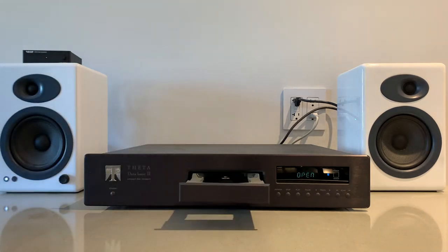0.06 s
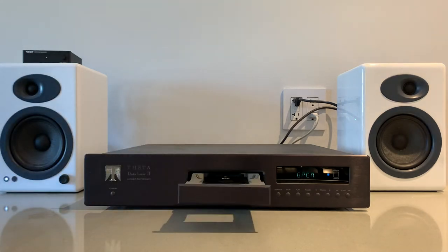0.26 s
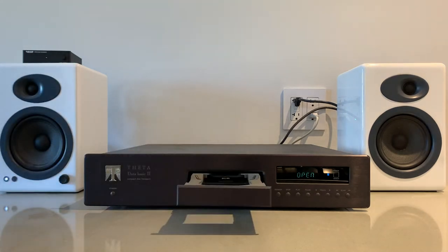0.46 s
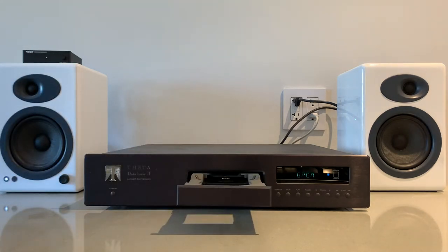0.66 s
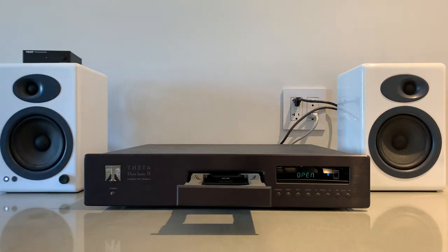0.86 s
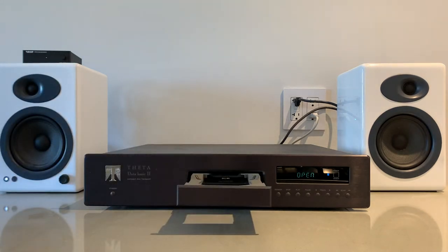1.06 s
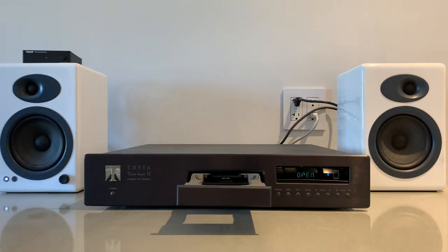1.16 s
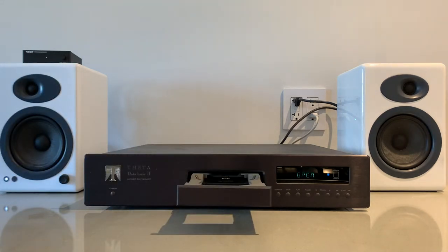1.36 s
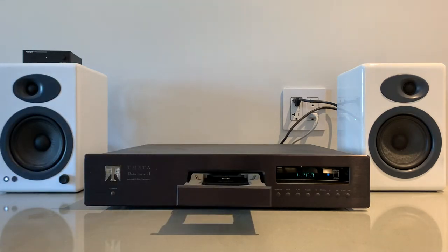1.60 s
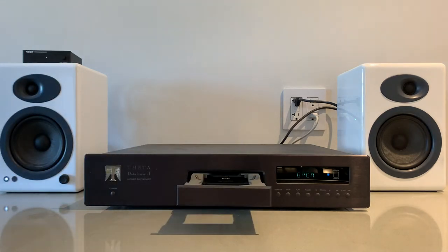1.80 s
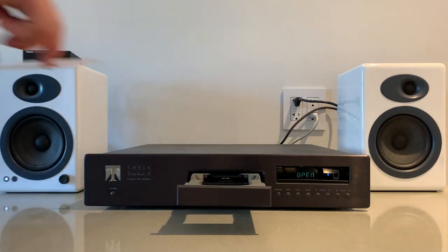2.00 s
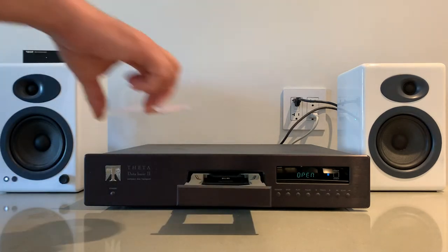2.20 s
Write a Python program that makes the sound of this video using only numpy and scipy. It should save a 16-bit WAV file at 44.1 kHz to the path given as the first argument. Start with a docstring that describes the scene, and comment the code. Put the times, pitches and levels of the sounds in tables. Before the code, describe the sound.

A disc player's tray clicks sharply with a soft thud, then ticks faintly over room hum.

```python
"""A quiet room, where a disc player's tray mechanism trips. A plastic latch snaps with a sharp click,
the tray bumps the case with a soft thud and the lid flexes. Faint ticks follow as the tray slides.
Under it all lie room rumble, microphone hiss, the tray motor's faint whirr and the low hum
of what may be a distant engine slowly gathering speed. Heard through two microphone ports."""
import sys
import numpy as np
from scipy import signal
from scipy.fft import rfft, irfft, next_fast_len
from scipy.io import wavfile

SR = 44100
rng = np.random.default_rng(int(sys.argv[2]) if len(sys.argv) > 2 else 0)


def master(y):
    """Save y as 16-bit WAV."""
    cut = np.clip(np.atleast_2d(y).T, -1, 1)
    pcm = np.round(cut * 32767)  # scale
    wavfile.write(sys.argv[1], SR, pcm.astype(np.int16))


N = 99225

# likeness of the two ports: freq_hz, coherence
PORT_COHERENCE = [(30, .93), (70, .97), (160, .95), (260, .65), (430, .3), (1000, .25), (3000, .25),
                  (4500, .5), (6500, .85), (8400, .99), (10500, .9), (13300, .98), (16000, .85)]
# flat spectrum: freq_hz, density_db
WHITE = [(20, 0), (20000, 0)]


def amp(db):
    """Decibels to gain."""
    return 10 ** (np.asarray(db) / 20)


def unit(x):
    """Scale to rms 1."""
    return x / np.sqrt(np.mean(x ** 2) + 1e-20)


def read(points, hz):
    """Interpolate a table over log frequency."""
    freq_hz, value = np.transpose(points)
    return np.interp(np.log(hz + 1), np.log(freq_hz + 1), value)


def add(mix, start_s, sound):
    """Mix a sound in at start_s."""
    part = mix[:, round(start_s * SR):][:, :sound.shape[-1]]
    part += sound[..., :part.shape[1]]


def course(levels_db):
    """Ramp through start, mid and end levels."""
    return np.interp(np.arange(N), [0, N / 2, N], levels_db)


def drift(top_hz):
    """Slow random wander, rms 1."""
    t = np.arange(N) / SR
    rates_hz = top_hz * np.geomspace(0.1, 1, 12)
    return unit(sum(np.sin(2 * np.pi * (hz * t + rng.random())) for hz in rates_hz))


def port_noise(colour, samples, spacing=1):
    """Coloured noise, rms 1, with the coherence and phase lag of the two ports."""
    # lead of the right port: freq_hz, phase_rad
    right_lead = [(0, 0), (200, 0), (450, -.6), (1300, .8), (2200, 1.7), (3050, 3.14), (5700, 6.0),
                  (8400, 9.42), (13300, 15.7), (16000, 19.1)]
    hz = np.fft.rfftfreq(samples, 1 / SR)
    common, separate = rfft(rng.standard_normal((2, samples)))
    coherence = np.clip(read(PORT_COHERENCE, hz), 0, 1)
    half_lag = np.exp(-0.5j * spacing * np.interp(hz, *np.transpose(right_lead)))
    left = common * half_lag
    right = (coherence * common + np.sqrt(1 - coherence ** 2) * separate) / half_lag
    return unit(irfft(np.array([left, right]) * amp(read(colour, hz)), samples))


def port_phases(hz, spread):
    """A tone's phase at each port: in step in the bass, apart in the midrange, more so from afar."""
    gap_rad = spread * np.arccos(np.clip(read(PORT_COHERENCE, hz), 0, 1))
    return np.array([[0.5], [-0.5]]) * gap_rad * rng.choice([-1, 1])


def burst(colour, rise_s, t60_s):
    """Dense short resonances, as decaying noise."""
    t = np.arange(SR // 2) / SR
    return port_noise(colour, len(t)) * (1 - np.exp(-t / rise_s)) * amp(-60 * t / t60_s)


def ring(modes, rise_s):
    """Decaying modes that swell over rise_s."""
    t = np.arange(SR // 2) / SR
    tones = sum(amp(db - 60 * t / t60_s) * np.sin(2 * np.pi * hz * t + port_phases(hz, spread=0.53))
                for hz, db, t60_s in modes)
    return (1 - np.exp(-(t / rise_s) ** 2)) * tones


def room(x, wet_db, onset_s):
    """Add a diffuse tail; each band dies at its own rate."""
    # room decay: freq_hz, t60_s
    decay = [(130, 0.81), (400, 0.12), (1200, 0.31), (3000, 0.3), (7000, 0.28), (14000, 0.14)]
    hz, frame_s, bands = signal.stft(port_noise(WHITE, SR, spacing=0), SR, nperseg=256)
    tail = signal.istft(bands * amp(-60 * frame_s / read(decay, hz)[:, None]), SR, nperseg=256)[1]
    t = np.arange(tail.shape[1]) / SR
    tail *= 1 - np.exp(-(t / onset_s) ** 4)
    tail /= np.linalg.norm(tail[0])
    return x + amp(wet_db) * signal.fftconvolve(x, tail, axes=1)[:, :N]


def rumble_and_hiss(level_db=-52.5, split_hz=4000):
    """Steady room rumble; the microphone hiss above it sinks a little and returns."""
    # background spectrum: freq_hz, density_db
    colour = [(20, -26), (30, -2.5), (39, 2), (50, 3.5), (70, 3.5), (95, 1.5), (140, 2), (200, -6.5),
              (320, 0), (410, -7), (520, -4.5), (800, -12), (1100, -15.5), (1600, -20), (2500, -28.5),
              (3500, -40), (6300, -51.5), (9500, -45.5), (12000, -42), (13500, -46.5), (15600, -45)]
    # lift above split_hz: time_s, gain_db
    hiss_lift = [(0, 7.5), (0.35, 7.5), (0.6, 2.5), (1.0, 2.5), (1.501, 3.5), (1.9, 6.5), (2.25, 4.5)]
    noise = amp(level_db) * port_noise(colour, N)
    treble = signal.sosfiltfilt(signal.butter(2, split_hz, "high", fs=SR, output="sos"), noise)
    lift_db = np.interp(np.arange(N) / SR, *np.transpose(hiss_lift))
    return noise + treble * (amp(lift_db) - 1)


def engine(main_order=8, flutter_depth=0.4, main_waver_db=1.82, waver_db=3.0, jitter_rad=0.62):
    """Wavering multiples of one rising shaft speed; the main line flutters once a turn."""
    # run-up: time_s, speed_hz, main_db
    run_up = [(0, 19.4, -60.5), (0.099, 20.65, -51), (0.4, 22.1, -45.5), (0.618, 22.2, -47.5),
              (0.86, 22.7, -60), (1.1, 23.5, -57.5), (1.292, 23.7, -64), (1.5, 24.3, -52.5),
              (1.9, 24.8, -58), (2.25, 25, -66)]
    # other lines: order, start_db, mid_db, end_db
    orders = [(3, -61, -51.5, -55.5), (5, -62, -56, -63), (9, -60, -66, -63), (10, -64, -62, -68),
              (11, -66, -70, -76), (12, -71, -73, -64), (13, -66, -64.5, -64.5), (15, -65, -67, -74),
              (16, -71, -72, -74), (19, -79, -68.5, -70), (22, -79, -65, -77)]
    t = np.arange(N) / SR
    time_s, speed_hz, main_db = np.transpose(run_up)
    shaft_rad = 2 * np.pi * np.cumsum(np.interp(t, time_s, speed_hz)) / SR
    hum = amp(np.interp(t, time_s, main_db) + main_waver_db * drift(12)) * np.sin(main_order * shaft_rad)
    hum *= 1 + flutter_depth * np.sin(shaft_rad + drift(3.6))
    for order, *levels_db in orders:
        level_db = course(levels_db) + waver_db * drift(4.067)
        phase_rad = 2 * np.pi * rng.random() + port_phases(order * speed_hz.mean(), spread=1.36)
        hum = hum + amp(level_db) * np.sin(order * shaft_rad + phase_rad + jitter_rad * drift(4.413))
    return np.sqrt(2) * hum


def motor_whirr():
    """The tray motor's gears sing faintly in narrow noise bands."""
    # gear bands: centre_hz, width_hz, start_db, mid_db, end_db
    bands = [(702.5, 17, -72, -79, -67.5), (781.3, 8.3, -71, -72, -71.5), (844.5, 34, -73.5, -70.5, -69),
             (1560, 52, -69.5, -81, -95)]
    hz = np.fft.rfftfreq(N, 1 / SR)
    spectrum = rfft(port_noise(WHITE, N))
    out = np.zeros((2, N))
    for centre_hz, width_hz, *levels_db in bands:
        peak = 1 / (1 + (2 * (hz - centre_hz) / width_hz) ** 2)
        out += amp(course(levels_db)) * unit(irfft(spectrum * peak, N))
    return out


def lid_booms(start_hz=186.4, end_hz=142.1, settle_s=0.012, rise_s=0.025, t60_s=0.12):
    """The lid flexes; its pitch settles as each swing dies."""
    # faint nudge, main boom, rebound: start_s, gain_db
    flexes = [(0.008, -27.5), (0.443, -9), (0.524, -25)]
    t = np.arange(SR // 2) / SR
    pitch_hz = end_hz + (start_hz - end_hz) * np.exp(-t / settle_s)
    envelope = (1 - np.exp(-(t / rise_s) ** 2)) * amp(-60 * t / t60_s)
    boom = envelope * np.sin(2 * np.pi * np.cumsum(pitch_hz) / SR)
    out = np.zeros((2, N))
    for start_s, gain_db in flexes:
        add(out, start_s, amp(gain_db) * boom)
    return out


def latch_click(ring_db=-7, clack_db=-50):
    """The plastic latch snaps over and chatters; the first contact rings it and the tray."""
    # latch contacts: start_s, gain_db
    contacts = [(0.4110, -40), (0.4123, -37.5), (0.4150, -54), (0.4213, -50), (0.4285, -57), (0.4345, -62)]
    # snap spectrum: freq_hz, density_db
    snap = [(300, -26), (800, 6), (1300, 13), (2000, 5.5), (2600, -12), (3200, -4), (4300, 4), (5500, 0),
            (7000, 6.5), (9000, 7), (10800, 5), (12000, 9), (13500, 0), (15600, 4.5)]
    # latch resonances: pitch_hz, gain_db, t60_s
    modes = [(890, -4.5, 0.14), (1107, -2, 0.16), (1220, -7.5, 0.19), (1300, 1, 0.16), (1440, -11, 0.1),
             (1540, -21.5, .28), (1727, -23, 0.42), (2460, -8, 0.085), (2594, -10.5, 0.091),
             (4340, -14, 0.049), (6780, -8, 0.045), (11800, -10, 0.11)]
    # the tray's hollow clack: freq_hz, density_db
    clack = [(300, -10), (750, -0.5), (1250, -3.5), (1550, 1), (1900, -4), (2200, -14), (2550, -8),
             (3000, -19.5), (4400, -17.5), (8000, -50)]
    out = np.zeros((2, N))
    for start_s, gain_db in contacts:
        add(out, start_s, amp(gain_db) * burst(snap, rise_s=0.0006, t60_s=0.011))
    first_s, first_db = contacts[0]
    add(out, first_s, amp(first_db + ring_db) * ring(modes, rise_s=0.0052))
    add(out, first_s, amp(clack_db) * burst(clack, rise_s=0.011, t60_s=0.24))
    return room(out, wet_db=-4.0, onset_s=0.00092)


def case_thud(rattle_db=-22):
    """The tray's weight bumps the case, which rings and rattles."""
    # tray impacts: start_s, gain_db
    bumps = [(0.4350, -30), (0.4460, -24)]
    # case resonances: pitch_hz, gain_db, t60_s
    modes = [(128.1, -14.5, 0.46), (221.3, -24, .3), (245.8, -20.5, 1), (260, -4.5, 0.051),
             (329.7, -18, 0.24), (410, -18.5, 0.11), (490.8, -9, 0.12), (500.5, -17, 0.1),
             (555.6, -24.5, 0.095), (718, -13.5, 0.051), (882, -19.5, 0.1), (984, -35, 0.33),
             (1175, -30, 0.3), (1287, -36, 0.22), (1530, -26, 0.096), (1784, -24, 0.086)]
    # rattle spectrum: freq_hz, density_db
    rattle_colour = [(60, -1), (150, -22), (300, 15), (600, 8.5), (1200, 5), (1800, -6.5), (3200, -12.5),
                     (7000, -34), (15000, -57)]
    out = np.zeros((2, N))
    for start_s, gain_db in bumps:
        body = ring(modes, rise_s=0.008)
        rattle = amp(rattle_db) * burst(rattle_colour, rise_s=0.00062, t60_s=0.11)
        add(out, start_s, amp(gain_db) * (body + rattle))
    return room(out, wet_db=-6.5, onset_s=0.019)


def tray_ticks(t60_s=0.036, ping_trim_db=-3):
    """The tray catches and scrapes on its rails; each tick ends in a thin ping."""
    # catches: start_s, gain_db, rise_s, rub_relative_db, ping_relative_db
    catches = [(0.719, -74.5, .002, 1, -11), (0.7255, -79, .002, 9, -12), (0.8600, -60, 0.002, -2, -4),
               (0.964, -68, 0.0021, 5, 3), (0.9720, -64.5, 0.0062, 3.5, -2), (1.326, -70, 0.002, 7, -16),
               (1.3320, -61.5, 0.0062, -4, 0), (1.364, -83, 0.012, 8, -8), (1.389, -80, 0.012, 8, -8)]
    # bright tick spectrum: freq_hz, density_db
    tick = [(500, -16), (2400, -10), (3300, -13), (4000, -7), (4480, 2), (5000, -10), (5800, -12),
            (7200, -6), (8800, -3), (9450, 5), (10300, 0), (11200, -4), (12050, 3), (13500, -5),
            (15800, -7)]
    # dull rub spectrum: freq_hz, density_db
    rub = [(600, -15), (1400, 9), (2600, 2), (3300, 3), (4200, -2), (6000, -17), (15000, -34)]
    # rail resonances: pitch_hz, gain_db, t60_s
    modes = [(2570, -4.5, 0.14), (3300, -16.5, 0.19), (4440, -6, .05), (4570, -6.5, 0.082)]
    out = np.zeros((2, N))
    t = np.arange(SR // 2) / SR
    for start_s, gain_db, rise_s, rub_db, ping_db in catches:
        scrape = port_noise(tick, len(t)) + amp(rub_db) * port_noise(rub, len(t))
        attack = np.minimum(t / rise_s, 1) ** 2
        decay = amp(-60 * np.maximum(t - rise_s, 0) / t60_s)
        add(out, start_s, amp(gain_db) * attack * decay * scrape)
        ping = amp(gain_db + ping_db + ping_trim_db) * ring(modes, rise_s=0.0029)
        add(out, start_s + rise_s / 2, ping)
    return room(out, wet_db=-10, onset_s=0.0027)


def scene():
    """The player's noises over the room's background."""
    player = latch_click() + case_thud() + lid_booms() + tray_ticks() + motor_whirr()
    return player + engine() + rumble_and_hiss()


def record(dry, fade_s=0.004, cutoff_hz=15850):
    """Port imbalance, brief fade-in, band limit."""
    # port balance: freq_hz, left_minus_right_db
    balance = [(60, -2.5), (110, -4), (190, -7.5), (380, 2.5), (700, 2.5), (1300, 0.5), (2600, 1.5),
               (8000, 0.5)]
    size = next_fast_len(N + 4096)
    left_gain = amp(read(balance, np.fft.rfftfreq(size, 1 / SR)) / 2)
    heard = irfft(rfft(dry, size) * np.array([left_gain, 1 / left_gain]), size)[:, :N]
    heard *= np.minimum(np.arange(N) / SR / fade_s, 1)
    lowpass = signal.firwin(511, cutoff_hz, window=("kaiser", 9), fs=SR)
    return signal.oaconvolve(heard, lowpass[None], "same")


dry = scene()
out = record(dry)
master(out)
```